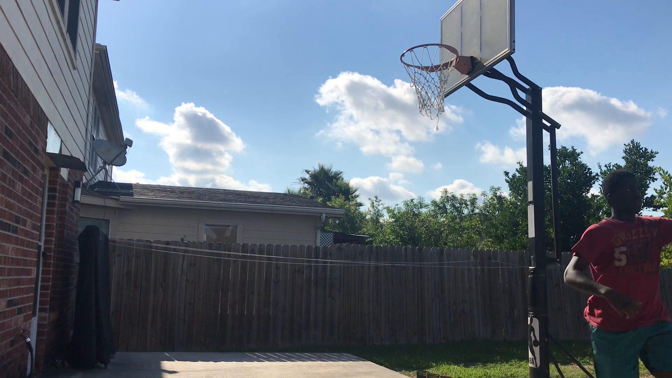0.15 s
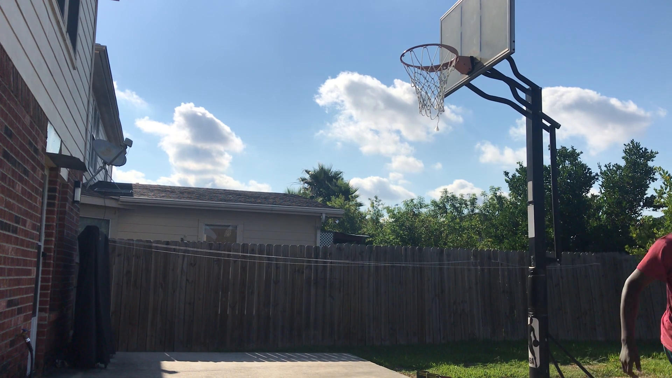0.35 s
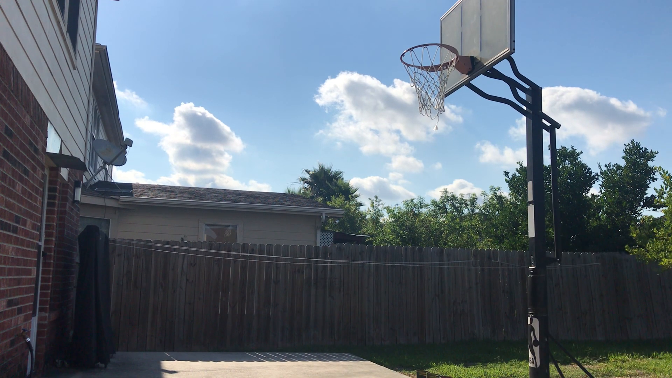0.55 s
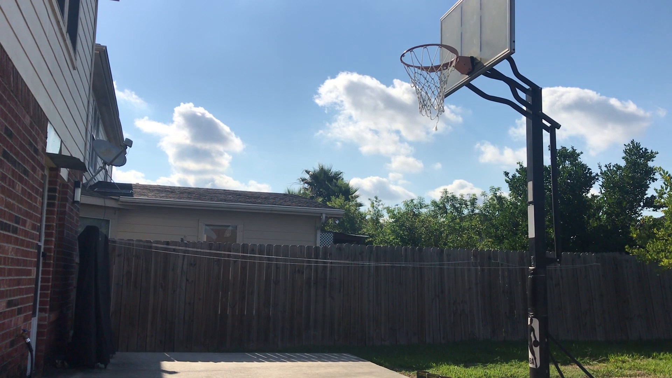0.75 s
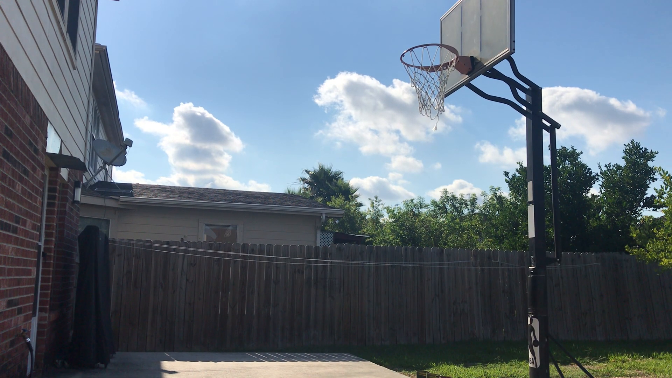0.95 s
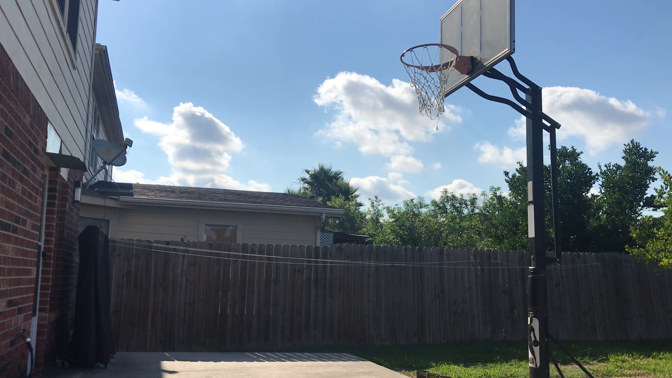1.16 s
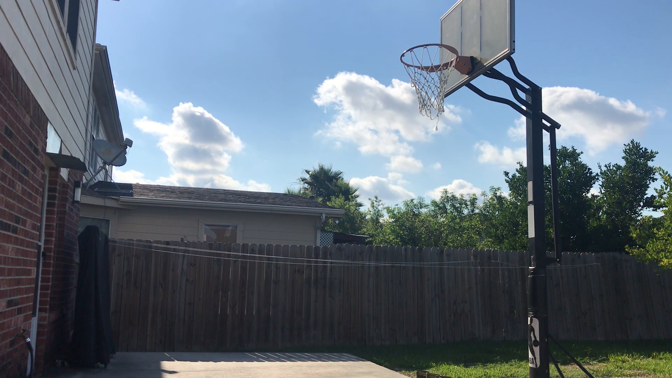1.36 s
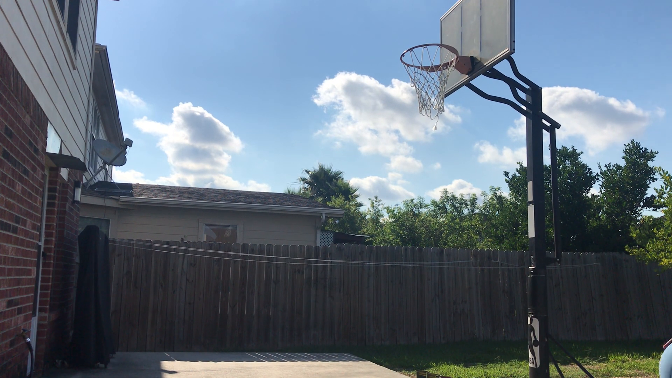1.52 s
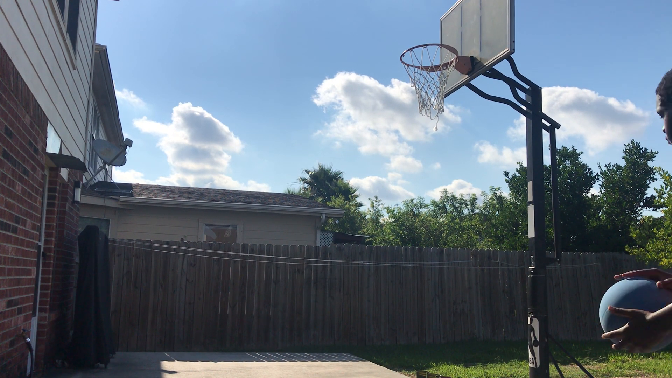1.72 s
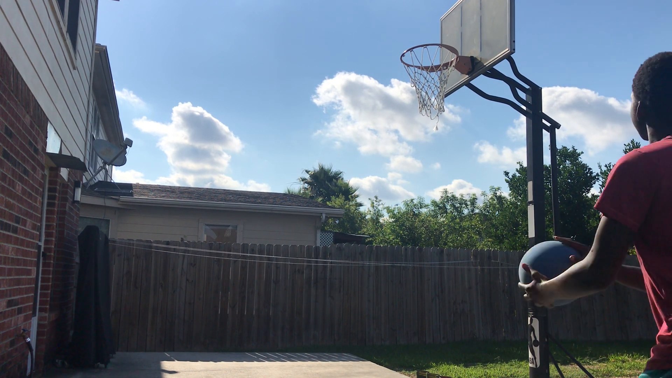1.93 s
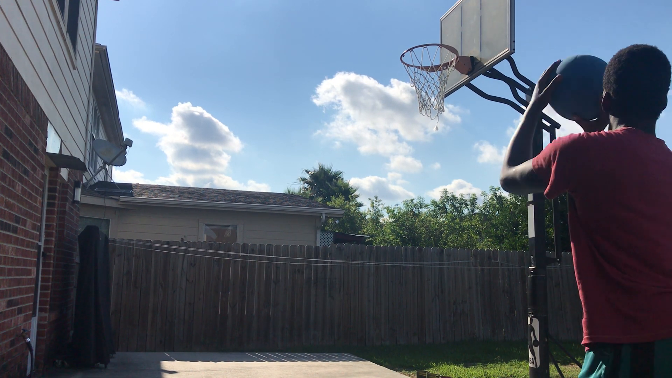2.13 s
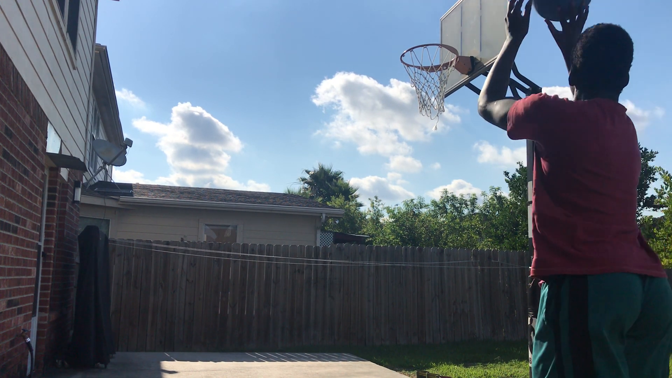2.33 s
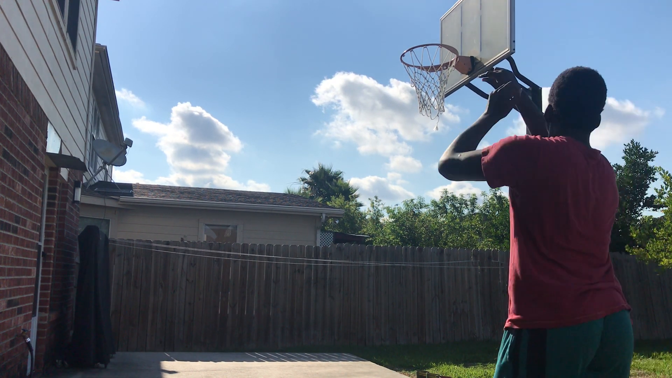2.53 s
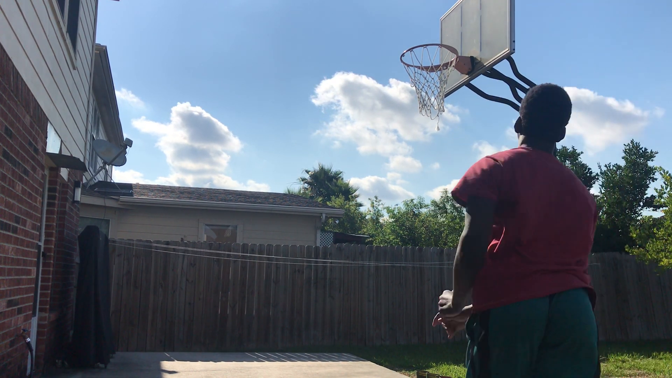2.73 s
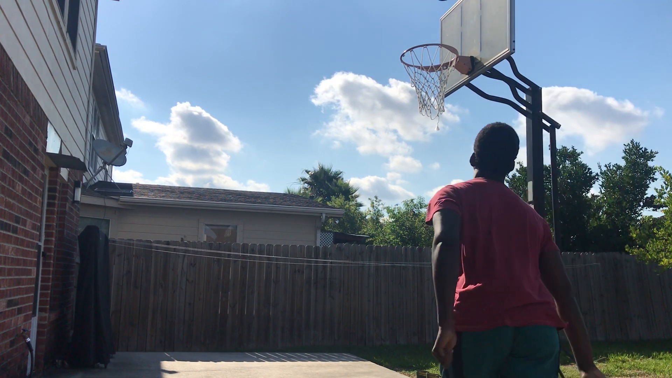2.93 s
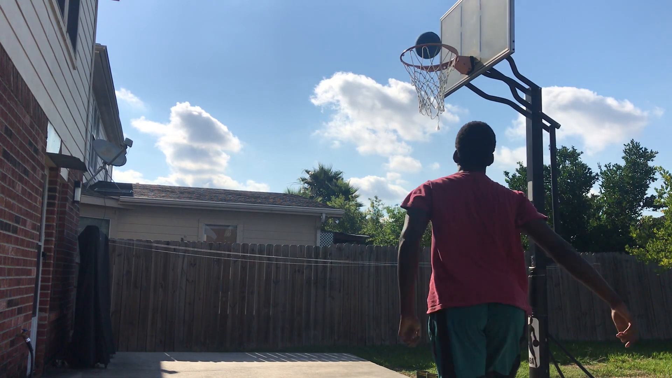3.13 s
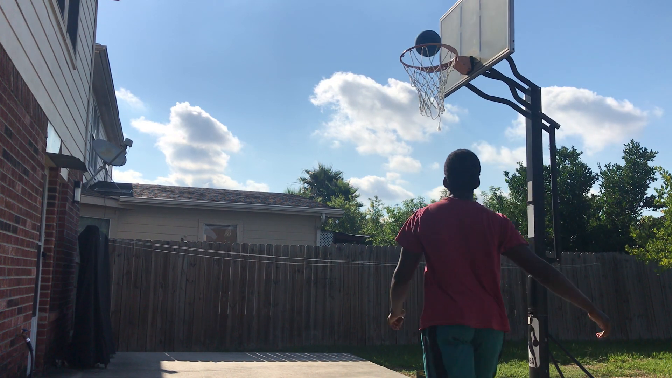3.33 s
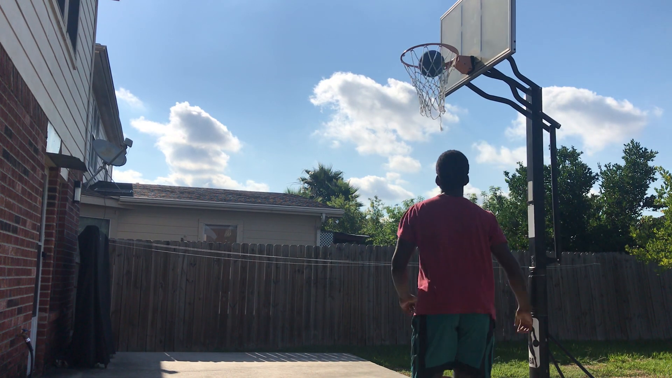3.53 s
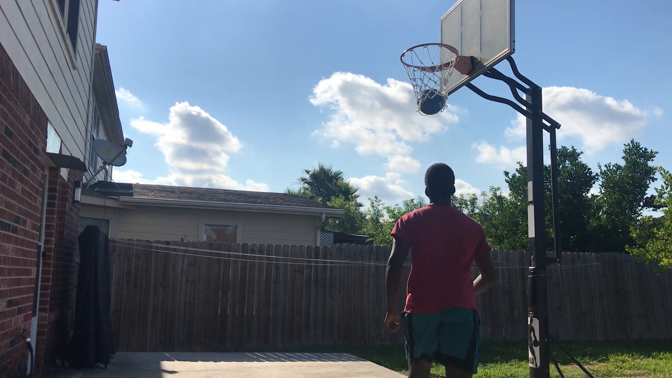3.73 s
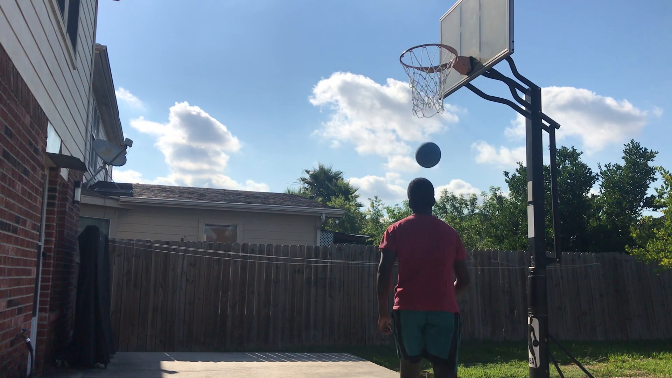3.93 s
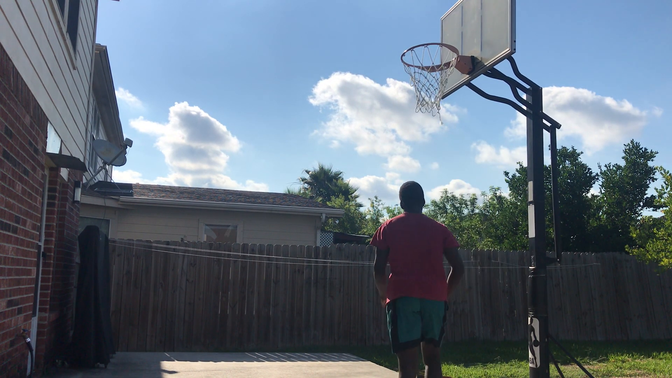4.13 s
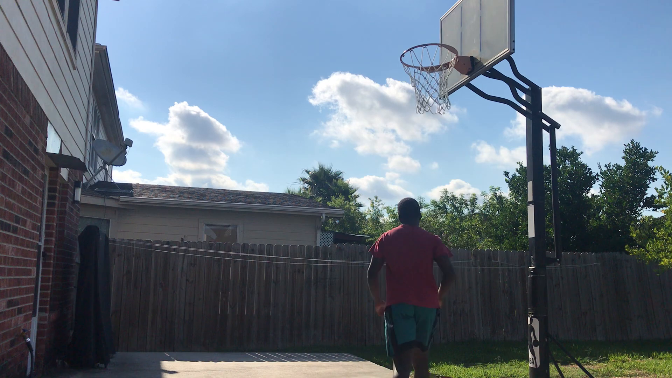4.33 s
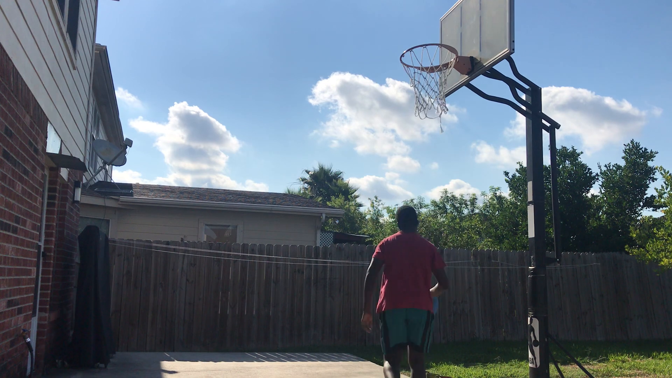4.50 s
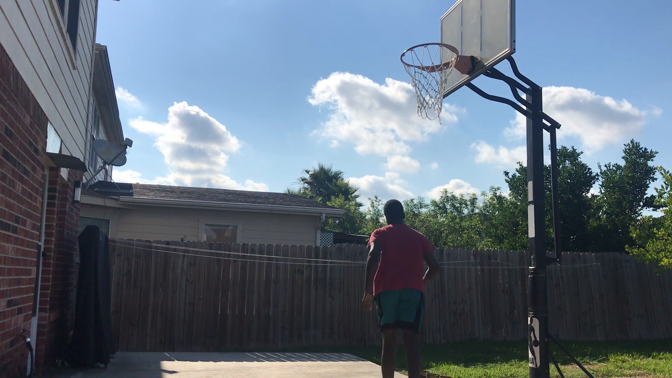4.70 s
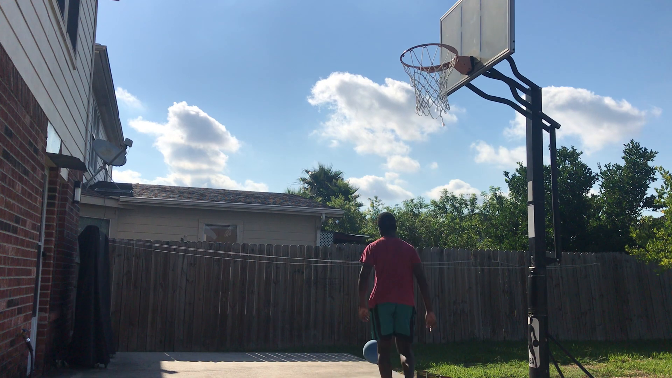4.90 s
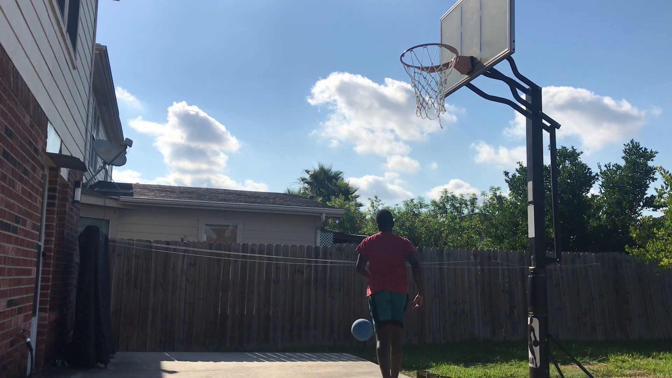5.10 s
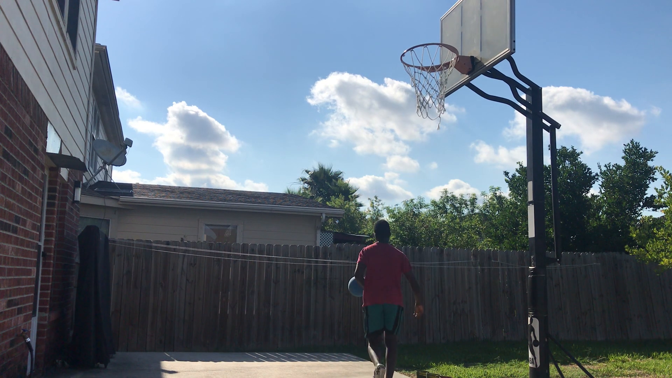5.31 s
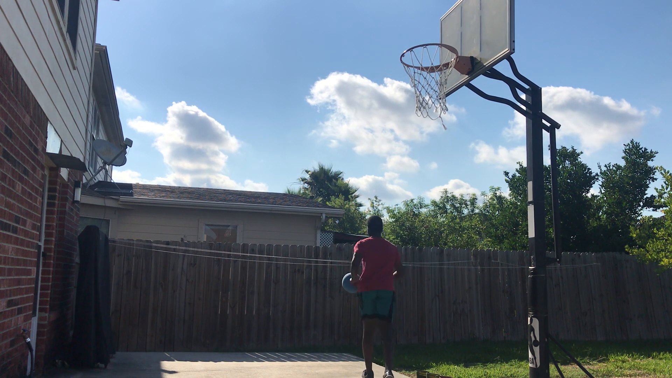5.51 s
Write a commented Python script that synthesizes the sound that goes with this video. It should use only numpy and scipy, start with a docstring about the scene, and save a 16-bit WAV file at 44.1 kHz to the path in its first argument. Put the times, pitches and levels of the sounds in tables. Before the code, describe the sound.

Light shoe scuffs and a small knock open the scene in a quiet yard. A rubber basketball bounces on concrete at about 0.7 and 1.4 seconds. These bounces are loud: each is a gritty crack, a hollow thump and a brief ping of the air inside, with a quick echo from nearby walls. Soft scuffs, taps and hand slaps on the ball follow until 3 seconds. From about 3.2 to 3.8 seconds the ball hits the hoop, quieter than the bounces: the steel rim rattles several times, strongest near 3.35, over a low backboard hum and pole thud. After a few more scuffs, the ball bounces again at 4.5 and 5.1 seconds. Throughout, distant traffic rumbles softly under faint leaves, a thin high insect buzz, long falling bird whistles and far chirps. One phone microphone hears everything.

```python
"""A rubber ball is dribbled on a concrete yard between a brick house and a wooden fence, then thrown
at a hoop: the rim rattles, the backboard booms, the ball drops and bounces twice. Each bounce is a
gritty crack, a thump of the shell and a ping of the air inside, thrown back by the walls.
Shoes scuff and hands slap the ball in bursts of friction noise. Behind them birds whistle,
insects buzz and far traffic rumbles. One phone microphone hears it all."""
import sys
import numpy as np
from scipy import signal
from scipy.fft import rfft, irfft, next_fast_len
from scipy.io import wavfile
from scipy.ndimage import map_coordinates

SR = 44100
rng = np.random.default_rng(int(sys.argv[2]) if len(sys.argv) > 2 else 0)


def unload_audio(sound):
    """Save the sound as a 16-bit wav file, at the path given as the first command line argument."""
    columns = np.transpose(np.atleast_2d(sound))
    # keep every value between -1 and 1, then stretch to whole-number steps
    steps = np.round(np.clip(columns, -1, 1) * 32767)
    wavfile.write(sys.argv[1], SR, steps.astype(np.int16))


N = 249606


def amp(db):
    """Decibels to gain."""
    return 10 ** (np.asarray(db) / 20)


def unit(x):
    """x scaled to rms 1."""
    return x / np.sqrt(np.mean(x ** 2) + 1e-20)


def along(points, hz):
    """Reads a curve of (freq_hz, value) points on a log frequency axis."""
    freqs, values = np.transpose(points)
    return np.interp(np.log(hz + 1), np.log(freqs + 1), values)


def wobble(rate):
    """A smooth random curve, rate knots a second."""
    return map_coordinates(rng.standard_normal(int(N * rate / SR) + 4), [np.arange(N) * rate / SR])


def filtered(x, response):
    """x through an EQ given as a function of frequency."""
    size = next_fast_len(len(x) + 4096)
    return irfft(rfft(x, size) * response(np.fft.rfftfreq(size, 1 / SR)), size)[:len(x)]


def resonant_noise(peaks):
    """Noise of rms 1 in (centre_hz, width_hz, level_db) resonances, each applied twice."""
    def response(f):
        return sum(amp(db) * (f * width) ** 2 / ((hz * hz - f * f) ** 2 + (f * width) ** 2)
                   for hz, width, db in peaks)
    return unit(filtered(rng.standard_normal(N), response))


def pulse(points, size=1024):
    """A minimum-phase click with a (freq_hz, level_db) spectrum, peak 1."""
    cepstrum = irfft(np.log(amp(along(points, np.fft.rfftfreq(size, 1 / SR)))))
    cepstrum[1:size // 2] *= 2
    cepstrum[size // 2 + 1:] = 0
    click = irfft(np.exp(rfft(cepstrum)))
    return click / np.abs(click).max()


def ring(modes, t, scatter_db, attack_s):
    """Decaying (pitch_hz, level_db, t60_s) modes, at new strengths for every blow."""
    tones = sum(amp(db + scatter_db * rng.standard_normal() - 60 * t / t60) * np.sin(2 * np.pi * hz * t)
                for hz, db, t60 in modes)
    return tones * (1 - np.exp(-t / attack_s))


def add(out, start_s, x):
    """Mixes x into out from start_s."""
    part = out[round(start_s * SR):][:len(x)]
    part += x[:len(part)]


# Tone of the outdoor bed: freq_hz, level_db
BED_EQ = [(20, -110), (30, -35), (45, 9.5), (65, 3), (120, -8), (200, -12.5), (400, -22.5), (1000, -23),
          (2000, -32.5), (4000, -39.5), (8000, -46), (16000, -44.5)]
def traffic_and_leaves():
    """Far traffic rumbles in slow lumps under a quicker flutter of leaves."""
    drift_db = -1.06 * wobble(1.9)
    noise = unit(filtered(rng.standard_normal(N), lambda hz: amp(along(BED_EQ, hz))))
    rumble = filtered(noise, lambda hz: 1 / (1 + (hz / 150) ** 4))
    traffic = rumble * amp(0.5 * wobble(4.9))
    leaves = (noise - rumble) * amp(-2 + 0.69 * wobble(11))
    return amp(-48 + drift_db) * (traffic + leaves)


# Bands of the insect buzz: centre_hz, width_hz, level_db
BUZZ_BANDS = [(10295, 120, 6), (9920, 910, -0.5)]
def insects(lull_s=3.42, lull_width_s=0.18, lull_db=17):
    """A narrow, high buzz in the trees that ducks once, briefly."""
    lull = np.exp(-((np.arange(N) / SR - lull_s) / lull_width_s) ** 2)
    return amp(-73.5 - lull_db * lull + 1.4 * wobble(40)) * resonant_noise(BUZZ_BANDS)


def bird_calls(rows, bend, peak_at, edge_db):
    """Gliding tones, made raspy by a fast flutter of level; a bend below 1 glides fastest at first."""
    out = np.zeros(N)
    for start_s, length_s, first_hz, last_hz, db in rows:
        progress = np.linspace(0, 1, round(length_s * SR))
        hz = first_hz + (last_hz - first_hz) * progress ** bend
        swell = amp(db - 3.5 - edge_db * (2 * (progress - peak_at)) ** 2)
        swell *= signal.windows.tukey(len(hz), 0.1)
        rasp = 1 + 1.1 * wobble(580)[:len(hz)]
        add(out, start_s, swell * rasp * np.sin(2 * np.pi * np.cumsum(hz) / SR))
    return out


# Bird cues, near and far: start_s, length_s, first_hz, last_hz, level_db
NEAR_WHISTLES = [(.97, .45, 6400, 6000, -68.5), (2.65, 0.59, 6400, 6000, -69.5),
                 (3.78, .58, 6360, 5720, -71.5), (4.68, 0.64, 6180, 5720, -69.5)]
FAR_CHIRPS = [(1.36, 0.077, 3900, 4700, -71), (1.76, 0.062, 4220, 3370, -70.5),
              (2.5, 0.078, 3300, 2800, -69), (3.15, 0.051, 4030, 4230, -68), (5.45, 0.14, 3020, 2410, -72)]
def birds():
    """One near bird sings long falling whistles; farther ones chirp."""
    near = bird_calls(NEAR_WHISTLES, bend=0.65, peak_at=0.3, edge_db=5)
    return near + bird_calls(FAR_CHIRPS, bend=1.4, peak_at=0.33, edge_db=3)


# Base tone of friction noise: freq_hz, level_db
GRIT_EQ = [(80, -16), (350, 10), (1000, 10.5), (2100, 6), (5000, -1), (12000, -0.25), (16000, -2.5)]
# Shelves that weight_db (lows) and bright_db (highs) turn up or down: freq_hz, share
WEIGHT_SHELF = [(350, 1), (1000, 0.5), (2100, 0.22), (5000, 0)]
BRIGHT_SHELF = [(5000, 0), (12000, 1)]
def contacts(rows, grain_db, tail_db, modes=()):
    """Friction bursts: a slap, a held stroke, a yard tail. Any modes given ring along as loose parts."""
    out, t = np.zeros(N), np.arange(SR // 2) / SR
    for start_s, db, weight_db, bright_db, hold_s, t60_s in rows:
        def colour(hz):
            shelves_db = weight_db * along(WEIGHT_SHELF, hz) + bright_db * along(BRIGHT_SHELF, hz)
            return amp(along(GRIT_EQ, hz) + shelves_db)
        grit = rng.standard_normal(len(t))
        grit *= amp(grain_db * np.repeat(rng.standard_normal(len(t) // 49), 49))
        slap = amp(3.5 - 60 * t / 0.0069)
        stroke = amp(-60 * np.maximum(t - hold_s, 0) / t60_s)
        tail = amp(tail_db - 60 * t / 0.5)
        envelope = (slap + stroke + tail) * (1 - np.exp(-t / 0.00026))
        burst = amp(db - 9) * envelope * filtered(unit(grit), colour)
        add(out, start_s, loose_parts(burst, modes) if modes else burst)
    return out


def loose_parts(burst, modes, detune=0.035, scatter_db=3):
    """Adds resonances to a jolt; each jolt shakes other parts, so pitches and strengths shift."""
    shaken = [(hz * (1 + detune * rng.standard_normal()), width, db) for hz, width, db in modes]
    def response(f):
        return 1 + sum(amp(db + 6.5 + scatter_db * rng.standard_normal())
                       * 1j * f * width / (hz * hz - f * f + 1j * f * width) for hz, width, db in shaken)
    return filtered(burst, response)


def ticks(count=14, weight_db=-12.5, bright_db=-12.5, hold_s=0.011, t60_s=0.032):
    """Faint ticks around the yard at random moments."""
    rows = [(rng.uniform(0, N / SR), -62 + rng.standard_normal(), weight_db, bright_db, hold_s, t60_s)
            for _ in range(count)]
    return contacts(rows, grain_db=6, tail_db=-15.5)


# Short pitched knocks: start_s, level_db, pitch_hz
KNOCK_CUES = [(0.018, -35, 2520), (0.381, -25.5, 1116), (0.378, -28.5, 1920), (.49, -40, 445),
              (1.06, -47, 583), (1.06, -33.5, 2220), (1.633, -36, 465), (1.721, -35, 450), (1.95, -41, 513),
              (2.484, -34.5, 1033), (2.952, -33, 1350), (3.725, -37.5, 1450), (3.75, -32, 248),
              (3.957, -34.5, 1327)]
def knocks():
    """Single damped tones; the higher ones die sooner."""
    out, t = np.zeros(N), np.arange(SR // 4) / SR
    for start_s, db, hz in KNOCK_CUES:
        t60_s = 0.044 * (1000 / hz) ** 0.32
        add(out, start_s, amp(db) * ring([(hz, 0, t60_s)], t, scatter_db=0.36, attack_s=0.0037))
    return out


# The player's foley: start_s, level_db, weight_db, bright_db, hold_s, t60_s
SCUFF_CUES = [(0.0152, -34, 6.5, -22, 0.0017, 0.096), (0.3445, -36, 1, -10.5, 0.0097, 0.19),
              (0.378, -34, 4.5, -27.5, 0.0043, 0.04), (0.3929, -48, -9, -16.5, 0.0057, 0.043),
              (0.4798, -50, 13.5, -10.5, 0.01, 0.037), (1.058, -36.5, 12, -13, 0.0037, 0.073),
              (1.112, -48.5, -11, -28, 0.0054, 0.1), (1.7138, -54.5, 15.5, -1.5, 0.015, 0.079),
              (1.932, -38, -9.5, -6, 0.0035, 0.039), (1.9905, -42, -25, -4.5, 0.0045, 0.1),
              (2.3137, -53.5, -7, -9, 0.011, 0.054), (2.4798, -47.5, 7, 1, 0.0073, 0.11),
              (2.744, -44, -20.5, 1.5, 0.015, 0.027), (2.9397, -34, -9, -10, 0.017, 0.12),
              (2.9744, -50, 3, -5, 0.0078, 0.038), (3.0398, -46, -8.5, -10.5, 0.018, 0.052),
              (3.926, -40.5, -20, -11, 0.03, 0.05), (3.9554, -37.5, -16, -5.5, 0.006, 0.18),
              (3.9674, -54.5, 1.5, -6.5, 0.052, 0.12), (4.0244, -45.5, -12, -20, 0.0066, 0.13),
              (4.4391, -44.5, -12.5, -18, 0.0052, 0.16), (4.8045, -48.5, -4.5, -10, 0.015, 0.087),
              (4.8853, -40.5, -7, -20, 0.014, 0.22), (5.2854, -38, -29.5, -21.5, 0.011, 0.16)]
def shoes_and_hands():
    """Soles scuff the concrete and palms slap the ball."""
    return contacts(SCUFF_CUES, grain_db=2.5, tail_db=-11)


# Ring of the steel rim and bracket: centre_hz, width_hz, level_db
STEEL_MODES = [(2146, 68, -7.5), (3540, 230, -9), (4370, 90, 0.5), (5470, 82, -4), (6770, 410, -11),
               (8600, 330, -8.5), (11650, 230, -10.5)]
def rim_rattle(hits, count=5, gap_s=0.029, drop_db=5, hold_s=0.0071, t60_s=0.08):
    """Each hit sets the loose fittings clattering a few times, ever weaker."""
    rows = []
    for start_s, db, weight_db, bright_db, loss_db, _, _ in hits:
        for k in range(count):
            jolt_s = start_s + k * gap_s * (1 + 0.1 * rng.standard_normal())
            jolt_db = db - (k > 0) * drop_db - k * loss_db
            rows.append((jolt_s, jolt_db, weight_db, bright_db, hold_s, t60_s))
    return contacts(rows, grain_db=1.5, tail_db=-6, modes=STEEL_MODES)


# Hum of the board: centre_hz, width_hz, level_db
BOARD_MODES = [(268, 197, 10), (654, 62, -2.5), (1010, 380, -3.5)]
# Thud of the pole: pitch_hz, level_db, t60_s
POLE_MODES = [(79, 1.2, 0.083)]
def backboard(hits, hum_t60_s=0.19, sway_t60_s=1.54):
    """Each hit thuds in the pole and makes the board hum; the swaying frame draws the hum out."""
    shake, thud, t = np.zeros(N), np.zeros(N), np.arange(SR) / SR
    fade = amp(-60 * t / hum_t60_s) + amp(-15 - 60 * t / sway_t60_s)
    rise = 1 - np.exp(-t / 0.01)
    for start_s, *_, hum_db, pole_db in hits:
        add(shake, start_s, amp(hum_db) * fade * rise)
        add(thud, start_s, amp(pole_db) * ring(POLE_MODES, t, scatter_db=1, attack_s=0.011))
    return shake * resonant_noise(BOARD_MODES) + thud


# Ball on rim and board: start_s, level_db, weight_db, bright_db, loss_per_rattle_db, hum_db, pole_db
HOOP_HITS = [(3.1937, -51.5, 8, -4, 13, -52, -51), (3.2115, -32.5, -12, -4, 19, -42, -39),
             (3.246, -34, -10.5, -9.5, 19, -50.5, -42), (3.308, -42, -25, -4.5, 18, -56, -40),
             (3.3449, -44, 14.5, -18, 1, -44, -45), (3.3521, -27, -9.5, -7.5, 2, -36, -21.5),
             (3.573, -45, 8, -10.5, 3.5, -50, -26), (3.616, -40.5, -9, -12, 12, -55, -43),
             (3.69, -53.5, 6, -22, 7, -51, -43), (3.744, -50.5, -12, -6, 9.5, -60.5, -42),
             (3.759, -50, -6, -24, 1, -46.5, -40)]
def hoop():
    """The shot lands: a steel rattle on top, board and pole underneath."""
    return rim_rattle(HOOP_HITS) + backboard(HOOP_HITS)


# Decay of the yard's reverb: freq_hz, t60_s
YARD_DECAY = [(100, 0.46), (400, 0.27), (1500, 0.53), (5000, 0.5), (12000, 0.59)]
# Tone of that reverb: freq_hz, level_db
YARD_EQ = [(80, 8), (250, 9), (500, -13), (1500, -9), (4000, -15.5), (8000, -19.5), (16000, -31.5)]
def yard_tail(dull_hz, grain_db=2.2):
    """A second of scattered echoes; each frequency dies at its own speed."""
    scatter = amp(grain_db * np.repeat(rng.standard_normal(SR // 100), 100))
    hz, t, spectrum = signal.stft(unit(rng.standard_normal(SR) * scatter), SR, nperseg=256)
    colour = amp(along(YARD_EQ, hz)) / np.sqrt(1 + (hz / dull_hz) ** 8)
    decay = amp(-60 * t / along(YARD_DECAY, hz)[:, None])
    return signal.istft(spectrum * colour[:, None] * decay, SR, nperseg=256)[1][:SR]


# Slapback off walls and fence: start_s, level_db, thump_db
WALL_ECHOES = [(0.712, -12.5, -27), (0.757, -25, -15), (0.798, -29.5, -22), (0.837, -35, -20),
               (1.4422, -14, -25), (1.4503, -20, -13.5), (1.4906, -24.5, -7), (1.571, -38, -3),
               (4.5008, -15, -2), (4.5155, -26, -8), (4.531, -15, -10), (4.5439, -24.5, -8),
               (4.5629, -27, -19), (4.574, -26, -9), (4.6117, -31, -29), (5.133, -19, 10.5),
               (5.14, -19, -9), (5.1561, -10, -4.5), (5.1694, -26, 0), (5.236, -24, -20)]
def add_wall_echoes(out, bounce_s, crack, thump, lag_s, dull_hz):
    """Rough walls return one bounce, dulling its crack and smearing it more the later it arrives."""
    t = np.arange(SR // 20) / SR
    for start_s, db, thump_db in WALL_ECHOES:
        delay_s = start_s - bounce_s
        if 0 < delay_s < 0.3:
            smear_t60_s = min(0.0052 + 0.2 * delay_s, 0.017)
            wall = rng.standard_normal(len(t)) * amp(-60 * t / smear_t60_s)
            smeared = signal.fftconvolve(crack, wall / np.linalg.norm(wall))
            add(out, start_s, amp(db) * signal.lfilter(*signal.butter(2, dull_hz, fs=SR), smeared))
            add(out, start_s + lag_s, amp(db + thump_db) * thump)


# Tone of the crack: multiple_of_centre, level_db
CRACK_EQ = [(.1, -44.5), (.3, -0.5), (.6, -2), (1, -2), (1.5, -8.5), (2.001, -14.5), (4, -36)]
def contact_crack(centre_hz, treble_db_per_octave):
    """A click, then milliseconds of grit as the contact patch peels off the slab."""
    t = np.arange(SR // 10) / SR
    grit = rng.standard_normal(len(t)) * amp(-19.5 - 60 * t / 0.016)
    grit[0] = -1  # the click
    spectrum = [(k * centre_hz, db + treble_db_per_octave * max(np.log2(k), 0)) for k, db in CRACK_EQ]
    return signal.fftconvolve(grit, pulse(spectrum))


# Body of the bounce, rubber shell and concrete slab: pitch_hz, level_db, t60_s
SHELL_MODES = [(112.7, -4.5, 0.072), (155.5, 7, 0.058), (242.6, -0.5, 0.052), (314, -12.5, 0.031),
               (653, -15, 0.046), (962, -16, 0.063)]
SLAB_MODE = (92, -0.89, 0.093)
def shell_thump(t, tilt_db_per_octave, boom_db):
    """The squashed shell thumps and the slab booms under it."""
    shell = [(hz, db + tilt_db_per_octave * np.log2(hz / 155), t60) for hz, db, t60 in SHELL_MODES]
    slab_hz, slab_db, slab_t60_s = SLAB_MODE
    slab = (slab_hz, slab_db + boom_db, slab_t60_s)
    return amp(-7) * ring([*shell, slab], t, scatter_db=1.2, attack_s=0.0019)


# Ring of the air inside the ball: pitch_hz, level_db, t60_s
CAVITY_MODES = [(1233, -8, .25), (1440, -9, .35), (1865, -8, .4), (2340, -8, 1.3), (2690, -10, .45),
                (3080, -6, 1.5), (3230, -9, .35), (3775, -7, 1.3), (4115, -10, .4), (4440, -14, .9),
                (4765, -13, 1.5), (5500, -14, .45)]
def cavity_ring(t, ping_hz, ping_db, split_hz=14):
    """The trapped air pings; a ball is never quite round, so each mode splits into a beating pair."""
    modes = [(ping_hz, ping_db, 0.36), *CAVITY_MODES]
    twins = [(hz + split_hz * rng.standard_normal(), db, t60) for hz, db, t60 in modes]
    return ring(modes + twins, t, scatter_db=2.5, attack_s=0.0011)


# Ball on concrete: start_s, level_db, crack_hz, thump_lag_s, thump_db, thump_tilt_db_per_octave,
# boom_db, ping_hz, ping_db, ring_db, tail_db, tail_dull_hz, echo_dull_hz, crack_treble_db_per_octave
BOUNCE_CUES = [(0.705, -5.5, 3580, 0.0014, -1, 2.5, -13, 1113, 9, -30.5, -10.5, 7800, 9000, 3.3),
               (1.4364, -5, 4110, 0.001, -5.5, 3.5, 4.5, 1067, 20, -36, -14.5, 7000, 4226, -1.5),
               (4.4977, -9, 3256, 0.00186, -1.5, 2, 4.5, 1033, 14, -30.5, -4.5, 6400, 14000, 4.5),
               (5.1297, -9.5, 3760, 0.003, 0, -1, -21, 1187, 19, -29, -3.5, 4030, 3940, 3.8)]
def ball():
    """Rubber slaps the slab: crack, thump and ringing air, then the yard and its walls answer."""
    out, t = np.zeros(N), np.arange(SR) / SR
    tail_swell = 1 - np.exp(-t / 0.0013)
    for (start_s, db, crack_hz, lag_s, thump_db, thump_tilt, boom_db, ping_hz, ping_db,
         ring_db, tail_db, tail_dull_hz, echo_dull_hz, crack_treble) in BOUNCE_CUES:
        crack = contact_crack(crack_hz, crack_treble)
        thump = shell_thump(t, thump_tilt, boom_db)
        add(out, start_s, amp(db) * crack)
        add(out, start_s + lag_s, amp(db + thump_db) * thump)
        add(out, start_s, amp(db + ring_db - 19) * cavity_ring(t, ping_hz, ping_db))
        add(out, start_s, amp(db + tail_db - 1.5) * tail_swell * yard_tail(tail_dull_hz))
        add_wall_echoes(out, start_s, crack, thump, lag_s, echo_dull_hz)
    return out


def scene():
    """The mono mix: the play up front, the outdoors behind."""
    play = ball() + shoes_and_hands() + hoop() + knocks()
    return (play + ticks() + birds() + insects() + traffic_and_leaves())[None]


def record(dry, low_cut_hz=32, top_hz=15900):
    """The phone drops the deepest bass and keeps nothing above its band limit."""
    return filtered(dry[0], lambda hz: (hz < top_hz) * (1j * hz / (low_cut_hz + 1j * hz)) ** 4)[None]


dry = scene()
out = record(dry)
unload_audio(out)
```